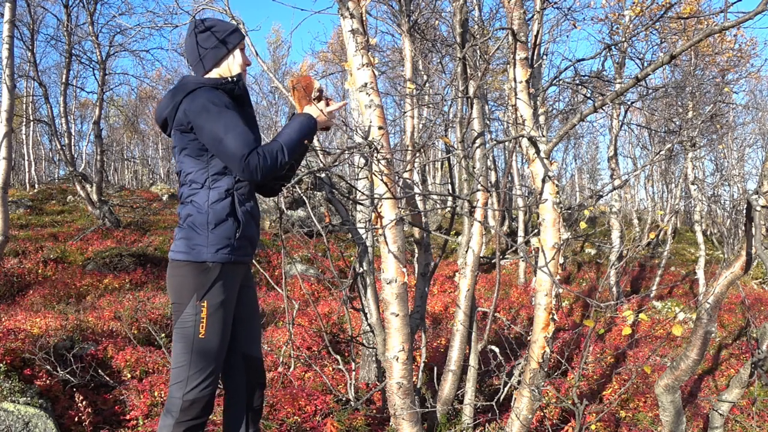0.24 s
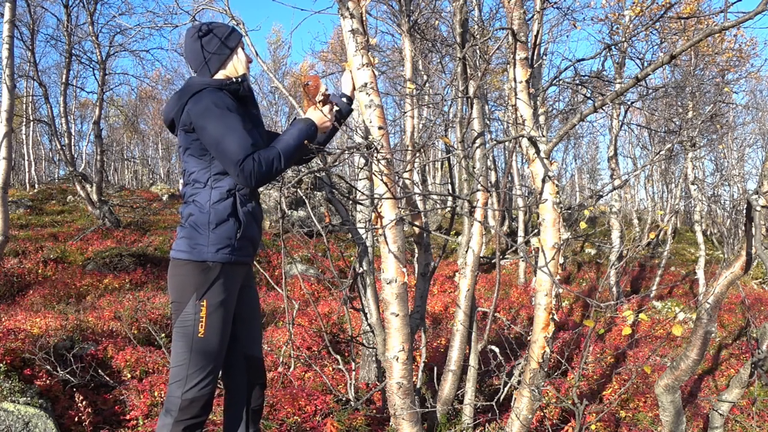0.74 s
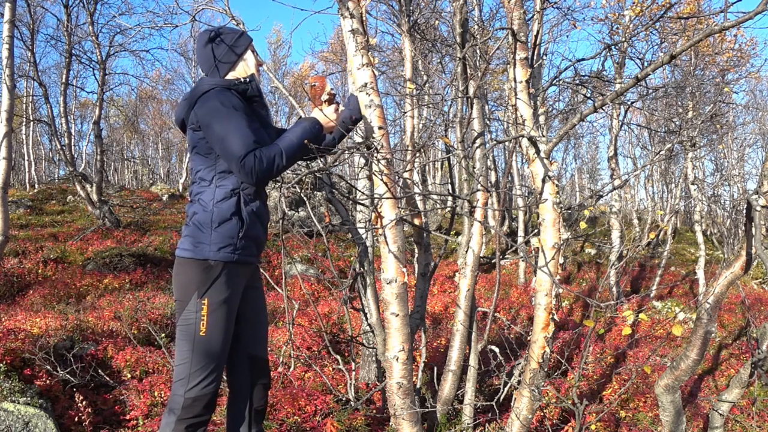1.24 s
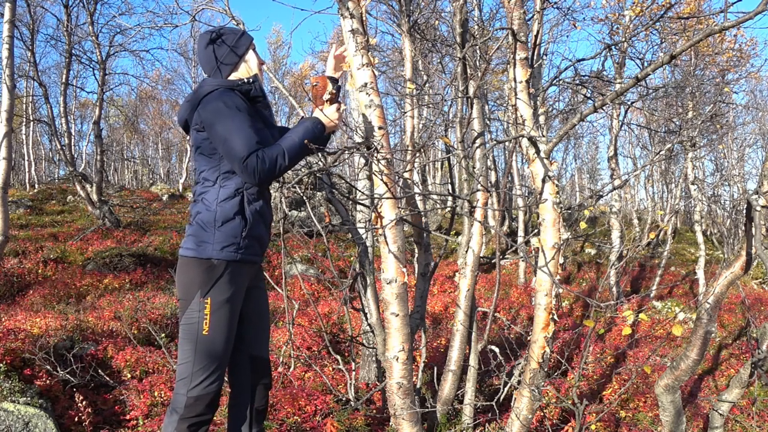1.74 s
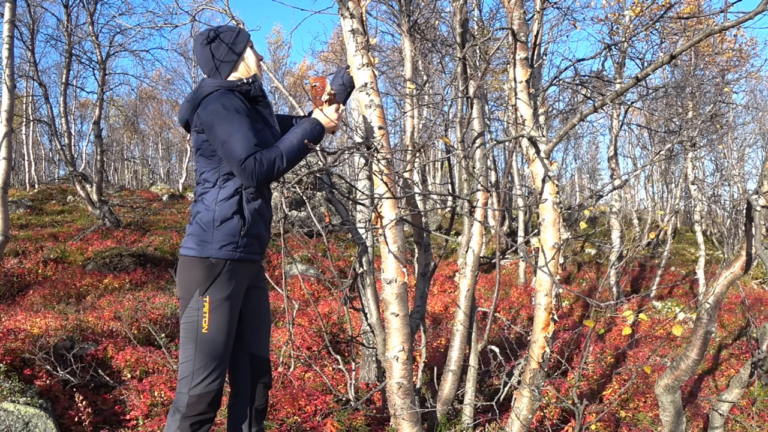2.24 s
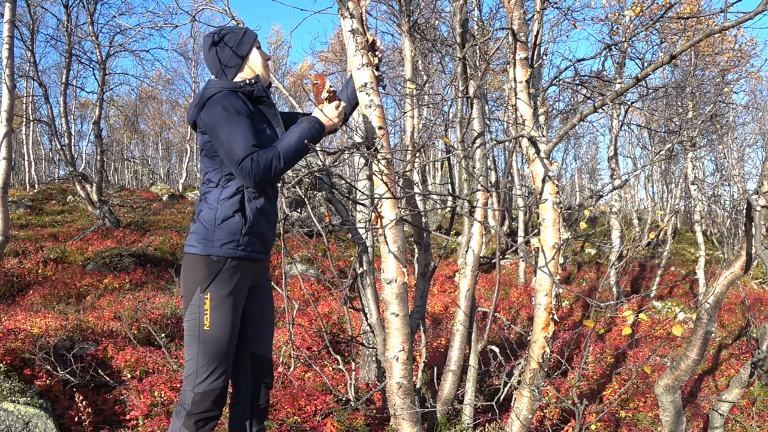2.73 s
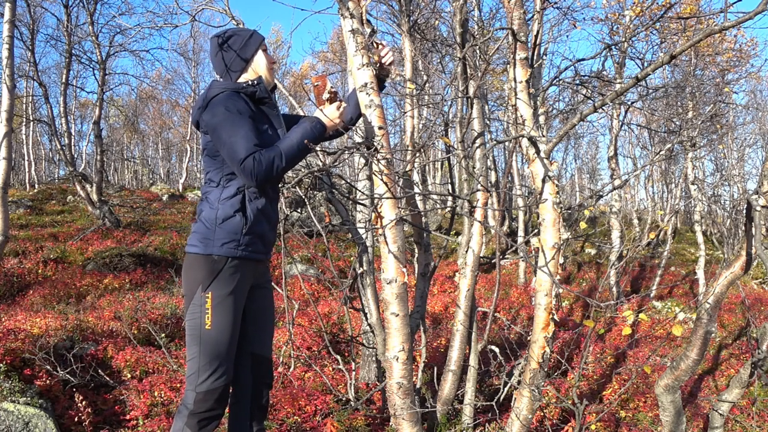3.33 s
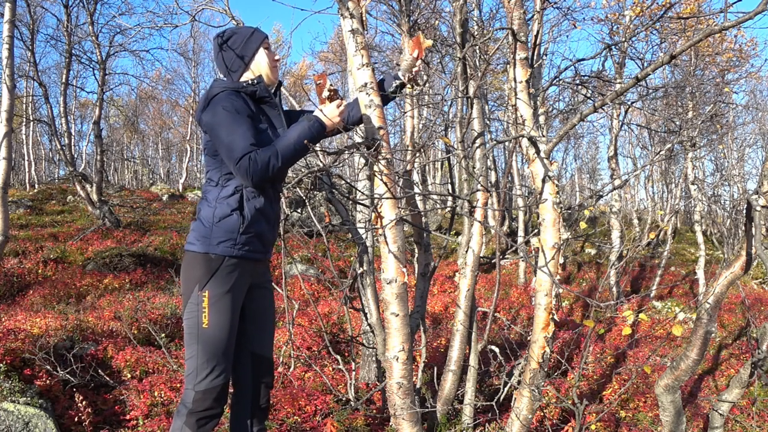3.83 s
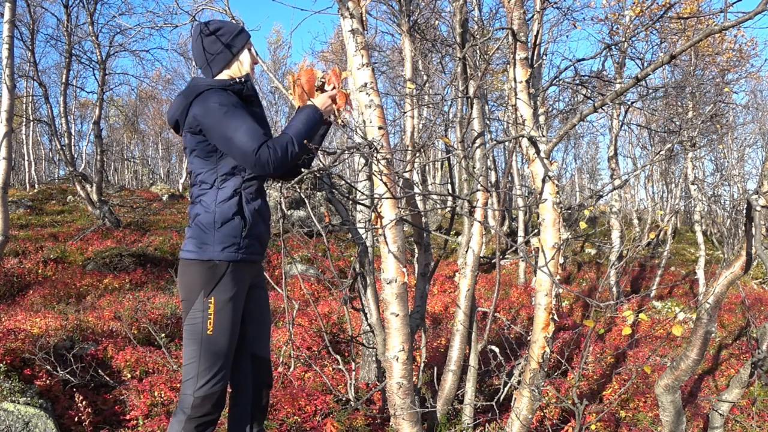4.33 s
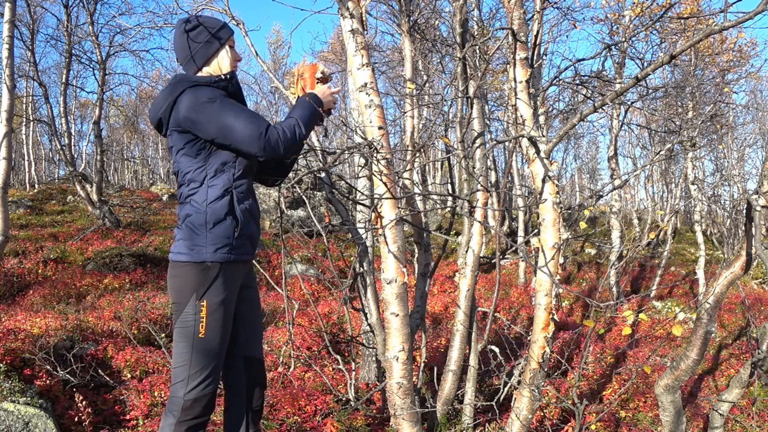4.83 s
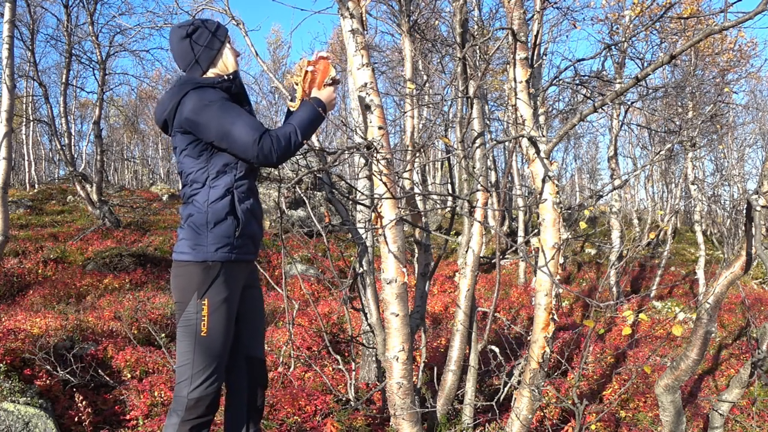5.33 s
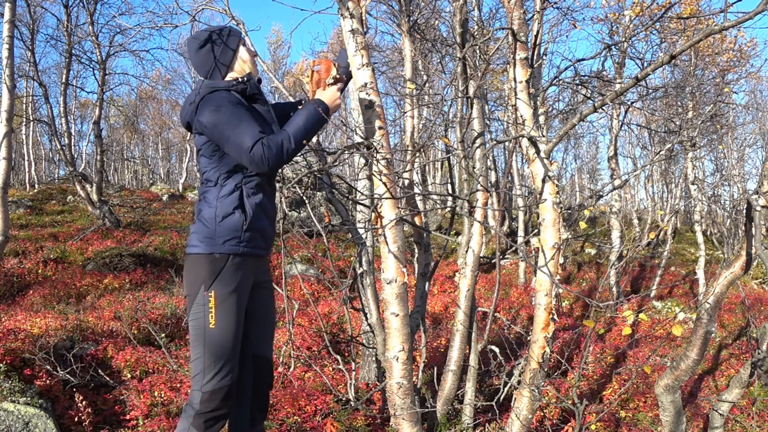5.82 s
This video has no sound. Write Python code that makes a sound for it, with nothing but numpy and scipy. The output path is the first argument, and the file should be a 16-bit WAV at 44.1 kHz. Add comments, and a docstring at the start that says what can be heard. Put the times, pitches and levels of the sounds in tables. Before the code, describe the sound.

Irregular crisp snaps, short rips and papery crinkling of dry bark pulled from a trunk, with soft outdoor rumble and faint hiss behind.

```python
"""A low rumble and faint hiss of air come first, then dry birch bark is peeled by hand in a quiet wood.
The papery layers crackle and rustle as the hand moves: grains of noise, coloured and swelled.
Snaps are millisecond bursts of noise with a shivering ring; tears are dense runs of tiny fractures.
Under a steady pull the bark creaks in dull resonant ticks. The trees add a thin, scattered echo."""
import sys
import numpy as np
from scipy import signal
from scipy.fft import rfft, irfft, next_fast_len
from scipy.io import wavfile
from scipy.ndimage import map_coordinates

SR = 44100
rng = np.random.default_rng(int(sys.argv[2]) if len(sys.argv) > 2 else 0)


def unload_audio(sound):
    """Save the sound as a 16-bit wav file, at the path given as the first command line argument."""
    columns = np.transpose(np.atleast_2d(sound))
    # keep every value between -1 and 1, then stretch to whole-number steps
    steps = np.round(np.clip(columns, -1, 1) * 32767)
    wavfile.write(sys.argv[1], SR, steps.astype(np.int16))


N = 267687  # length of the scene [samples]

# colour of the open air: (frequency [Hz], relative level [dB])
AIR_COLOUR = [(15, -2), (28, 0), (52, 1.5), (80, -1), (130, -14), (250, -11.5), (500, -11), (1100, -13.5),
              (2000, -21.5), (4000, -25), (6300, -23), (9000, -32.5), (13000, -43), (16000, -59)]
# how alike the air is in the two ears: (frequency [Hz], likeness [0 to 1])
AIR_LIKENESS = [(60, 1), (130, 0.69), (400, 0.033), (1500, 0.04), (6000, 0.073)]

# the hand bends the sheet and it crinkles: (start [s], length [s], middle level before a trim [dB])
CRINKLE_MOVES = [(0.03, 0.21, -54), (0.18, 0.19, -48.5), (0.77, 0.33, -54), (1.17, 0.62, -60.5),
                 (1.97, 0.26, -53), (2.2, 0.71, -57), (2.86, 0.13, -51.5), (3.1, 0.55, -51.5),
                 (3.76, 0.12, -52.5), (3.94, 0.075, -51), (4.2, 0.74, -56.5), (4.8, 0.17, -50.5),
                 (5.0, 0.22, -48.5), (5.4, 0.33, -62.5), (5.69, 0.24, -60.5)]
# sleeve and glove rub along: (start [s], length [s], middle level before a trim [dB])
RUB_MOVES = [(0.13, 0.27, -53.5), (2.26, 0.48, -57), (2.69, 0.12, -53), (3.47, 0.19, -53.5),
             (4.32, 0.25, -49), (4.62, 0.2, -54), (4.85, 0.45, -55), (5.68, 0.2, -56)]
# colour of the crinkling paper: (frequency [Hz], relative level [dB])
CRINKLE_COLOUR = [(880, -57), (1500, -12), (1740, -11), (2100, -8), (2800, -8.5), (3920, -4), (4970, -9),
                  (6430, 0), (9100, -11.5), (11000, -11), (13800, -24.5), (16000, -33)]
# colour of the rubbing: (frequency [Hz], relative level [dB])
RUB_COLOUR = [(200, -29), (500, -8), (1100, -2), (2500, -6), (4000, -2), (8000, -9), (16000, -43)]
HELD_CRINKLE_DB, HELD_RUB_DB = -70, -79  # the sheet merely held, before the same trims
HAND_SWELL_DB = 5  # the middle of a movement over its ends

# how long the echo lasts in the wood: (frequency [Hz], time to fall 60 dB [s])
ECHO_DECAY = [(200, 1), (1000, 0.47), (4000, 0.18), (12000, 0.22)]
# strength of the echo: (frequency [Hz], level [dB])
ECHO_LEVEL = [(200, -15), (1000, -8.5), (2500, -14), (6000, -16), (14000, -8)]

# loud fractures of the bark:
# (time [s], level [dB], body [dB], edge [dB], after-ring before a trim [dB])
FRACTURES = [(0.0542, -45, 1, -16, -5), (0.088, -40.5, -4, -6, -9), (0.221, -41, 4, -6, -3.5),
             (0.3723, -44.5, 3, 0, -3), (0.666, -52.5, -2, 17, -13), (0.9342, -42.5, 12.5, -1, -6.5),
             (0.982, -27.5, 2, 9, -12), (1.0038, -39, 4, 7, -4), (1.0284, -36.5, -3, 1, -18),
             (1.0439, -39.5, 6.5, -5, -4),          (1.2026, -49, -2, 7, -7), (1.253, -22, 3, -0.5, -6.5),
             (1.3221, -33.5, 6.5, -3, -2.5), (1.358, -36, 3, 4, -6), (1.5641, -45, -1, 10, -11),
             (2.1162, -40, 0, 1, -4.5), (2.3514, -38, -3, 14, -5), (2.361, -32, -8, -4, -0.5),
             (2.402, -23.5, -1.5, -6, -12), (2.4167, -29, -4, -11, -5), (2.4318, -26, -3.5, 0, -12),
             (2.5765, -29, -10.5, -12, -27), (2.5938, -39.5, 14, 1, -7), (2.6036, -32.5, -4, 1, -11),
             (2.6129, -34.5, 7.5, 6, -13), (3.0416, -38, 11, 1, -7.5), (3.0774, -44, 5, 8, -6.5),
             (3.2242, -35, -22, 2, -6), (3.233, -29, 3, -2, -7.5), (3.2528, -23.5, 1, 3, -14.5),
             (3.311, -33, 10.5, -7, -12), (3.3261, -29, -1, 8, -13), (3.3424, -37.5, 1, -8, -13),
             (3.3914, -30.5, -2, 0, -2), (3.3972, -21, -3, -9, -6), (3.405, -26, -2.5, -1, -10),
             (3.413, -34, 5, 1, -5), (3.442, -36.5, 5, -4, -16), (3.4688, -32, -4, 3, -3.5),
             (3.5301, -29, 11, 0, -6), (3.599, -40, 8, 4, -7), (3.722, -39, 6, -11, -19),
             (3.8157, -40, -21, -7, -25), (3.822, -38.5, -17, -4, -9), (3.935, -47, 6, -9, -7),
             (3.954, -40, -2, -9, -1.5), (4.004, -41.5, -2, -11, -1.5), (4.1985, -42.5, 1, -5, -4.5),
             (4.9297, -39, -14, 6, -8), (5.1528, -46, 11, -4, -8), (5.323, -42.5, -21, 13, -21),
             (5.6912, -43, 6, -5, -3), (5.833, -28, -7.5, -12, -16), (5.8632, -33, -4, -5.5, -17),
             (5.9337, -31, -2, -1, 0), (5.9491, -31.5, -7, -5, -19), (5.98, -35, -1, -17, -19),
             (6.025, -38, 6, -3, -6), (6.0551, -29, 0, 5, -7), (6.0622, -26, 7, 1, -8)]
# colour of breaking bark: (frequency [Hz], relative level [dB])
BARK_COLOUR = [(59, -60), (100, -19.5), (289, -18), (1100, -9), (2000, -10.5), (2800, -7), (3620, -4.5),
               (4290, 0), (5080, -5.5), (6290, 3), (8830, -10.5), (10200, -10.5), (11600, -14),
               (13500, -23.5), (16000, -38)]

# a layer zips off the one below: (start [s], length [s], level before a trim [dB], body [dB])
TEAR_STROKES = [(0.271, 0.064, -50.5, 5), (0.991, 0.053, -47, 0.5), (1.279, 0.074, -48, 2),
                (2.37, 0.035, -41, 0), (2.407, 0.044, -34, 3), (2.567, 0.033, -51, 10),
                (3.4, 0.04, -42, 6.5), (3.463, 0.037, -41, 3), (3.519, 0.093, -42, 2),
                (4.634, 0.014, -47, -2.5), (4.795, 0.018, -42, -1.5), (4.816, 0.018, -37, -14.5),
                (4.885, 0.013, -42, -6), (5.953, 0.068, -45.5, 3.5)]
TEAR_ATTACK_S, TEAR_RELEASE_S = 0.0037, 0.025

# hard slips that stand out of the creak: (time [s], level [dB])
HARD_SLIPS = [(0.767, -46), (0.786, -43.5), (0.828, -41.5), (0.847, -46.5), (0.901, -42), (1.005, -47),
              (1.113, -43.5), (1.18, -43), (1.229, -38.5), (1.297, -42), (1.372, -44), (1.428, -47.5),
              (1.477, -46.5), (1.527, -45.5), (1.603, -42), (1.638, -45), (1.685, -46.5), (2.239, -47.5),
              (2.282, -45), (2.294, -46)]
# steady pulls that make the sheet creak: (start [s], length [s], usual level of small slips [dB])
STEADY_PULLS = [(0.723, 0.17, -49), (1.072, 0.095, -48), (1.42, 0.38, -56), (2.205, 0.11, -52)]
# dull resonances of the creak: (frequency [Hz], width [Hz], level [dB])
CREAK_MODES = [(673, 170, 4), (1145, 150, 3), (2260, 130, -11)]
SLIP_PITCH_SPREAD = 0.085  # octaves
SLIP_GAP_S, SLIP_UNEVEN = 0.022, 0.3  # typical gap, and the spread of its natural logarithm
SLIP_SPREAD_DB = 2

# ripple of the microphone port: (frequency [Hz], gain [dB])
PORT_RIPPLE = [(5300, 0.5), (6050, 0.1), (6600, -1.5), (7600, .5), (8800, -0.35), (10200, 0.36),
               (12000, -3.5), (13400, 2.5), (15500, 0)]
TOP_HZ = 16000  # upper band limit


def amp(db):
    """Turn decibels into gain."""
    return 10 ** (np.asarray(db) / 20)


def unit(x):
    """Scale a sound to an rms of 1."""
    return x / np.sqrt(np.mean(x ** 2) + 1e-20)


def along(points, hz):
    """Read (Hz, value) points between their knots on a log frequency axis."""
    f, v = np.transpose(points)
    return np.interp(np.log(hz + 1), np.log(f + 1), v)


def wobble(rate):
    """Draw a smooth random curve with this many knots a second."""
    knots = rng.standard_normal(int(N * rate / SR) + 4)
    return map_coordinates(knots, [np.arange(N) * rate / SR])


def filtered(x, response):
    """Shape a sound by a response that depends on frequency."""
    m = next_fast_len(N + SR // 2)
    hz = np.fft.rfftfreq(m, 1 / SR)
    return irfft(rfft(x, m) * response(hz), m)[..., :N]


def causal(gain):
    """Give a gain curve minimum phase, so the sound starts promptly with nothing ahead of it."""
    cep = irfft(np.log(np.maximum(gain, 1e-6)))
    half = len(cep) // 2
    folded = np.r_[cep[0], 2 * cep[1:half]]
    return np.exp(rfft(folded, len(cep)))


def resonances(modes, hz):
    """Add up resonances, each passing a band around its own frequency."""
    return sum(amp(db) * 1j * hz * width / (centre * centre - hz * hz + 1j * hz * width)
               for centre, width, db in modes)


def add(track, s, sound):
    """Mix a sound into the track at time s."""
    part = track[max(round(s * SR), 0):][:len(sound)]
    part += sound[:len(part)]


def air(level_db=-56):
    """Steady low rumble and faint hiss of open air, wide except in the deep bass."""
    def colour(hz):
        # more of the side signal makes the two ears less alike
        turn = np.arccos(np.clip(along(AIR_LIKENESS, hz), -1, 1)) / 2
        return amp(along(AIR_COLOUR, hz)) * [np.cos(turn), np.sin(turn)]

    mid, side = filtered(rng.standard_normal((2, N)), colour)
    drift_db = 0.2 * wobble(2.37)
    return amp(level_db + drift_db) * unit(np.array([mid + side, mid - side]))


def movements(rows, rest_db):
    """Gain of hand movements over a resting level: each speeds up to its middle and slows again."""
    t = np.arange(N) / SR
    power = amp(rest_db) ** 2
    for s, length, db in rows:
        off_middle = 2 * (t - s) / length - 1  # -1 at the start, 1 at the end
        power = power + amp(db - HAND_SWELL_DB * off_middle ** 2) ** 2
    return np.sqrt(power)


def crackles(rate, spread_db):
    """Tiny fractures at random moments, rate a second on average, each a short puff of noise."""
    chance, size = rng.random(N), rng.standard_normal(N)
    sign = rng.choice([-1, 1], N)
    pulses = (chance < rate / SR) * amp(spread_db * np.minimum(size, 2)) * sign
    t = np.arange(SR // 50) / SR
    fade = np.exp(-t / 0.0003) + 0.09 * np.exp(-t / 0.0032)  # a quick drop and a weak, longer tail
    energy = np.convolve(pulses ** 2, fade)[:N]
    return unit(np.sqrt(energy) * rng.standard_normal(N))


def handling(crinkle_db=-1, tick_db=-5, rub_db=-4):
    """Papery layers slide and crinkle; sleeve and glove rub along with them."""
    crinkle_gain = movements(CRINKLE_MOVES, HELD_CRINKLE_DB)
    rub_gain = movements(RUB_MOVES, HELD_RUB_DB)
    grip = amp(3.36 * wobble(60))  # the sliding catches and lets go
    fine = crackles(rate=2200, spread_db=8.5)
    ticks = crackles(rate=70, spread_db=6.0)
    grains = (fine + amp(tick_db) * ticks) * grip
    paper = unit(filtered(grains, lambda hz: causal(amp(along(CRINKLE_COLOUR, hz)))))
    friction = crackles(rate=1800, spread_db=7.5) * grip
    rub = unit(filtered(friction, lambda hz: amp(along(RUB_COLOUR, hz))))
    return amp(crinkle_db) * crinkle_gain * paper + amp(rub_db) * rub_gain * rub


def trees(x):
    """Trunks and ground scatter a thin echo, different in each ear."""
    hz, t, noise = signal.stft(rng.standard_normal((2, SR * 3 // 4)), SR, nperseg=256)
    late = amp(-60 * t / along(ECHO_DECAY, hz)[:, None])
    early = 3.9 * amp(-60 * t / 0.012)  # strong at first, down 60 dB in 12 ms
    tail = signal.istft(noise * (late + early), SR, nperseg=256)[1]
    tail = tail / np.linalg.norm(tail[0])
    delayed = np.pad(x, (SR // 300, 0))[None]  # the echo starts about 3 ms late
    wet = signal.fftconvolve(delayed, tail, axes=1)[:, :N]
    return filtered(wet, lambda hz: amp(along(ECHO_LEVEL, hz)))


def snaps(burst_s=0.0012, lead_s=0.0011, lead_db=-10, ring_t60=0.064, ring_db=-3,
          body_hz=1800, edge_hz=9000, flake_db=1.55, size=8192):
    """First fibres give, the rest break in a millisecond burst, then the stiff sheet shivers."""
    track, hz = np.zeros(N), np.fft.rfftfreq(size, 1 / SR)
    t = (np.arange(size) - SR // 200) / SR  # 5 ms of room for the first fibres
    age = np.abs(t)
    head, after = (t >= 0) & (t < .0034), (t >= .0034) & (t < .01)  # where the levels are set
    fading = (t > 0) * amp(-60 * age / ring_t60) * (1 - np.exp(-age / burst_s))
    for s, db, body_db, edge_db, after_db in FRACTURES:
        fibres, shiver, clumps = rng.standard_normal((3, size))
        # a clean break is over sooner and leaves the sheet quieter
        length = burst_s * amp(.5 * np.clip(after_db + 12.5, -20, 3))
        breaking = np.where(t < 0, amp(lead_db) * np.exp(-age / lead_s), np.exp(-age / length))
        # broad flakes have more body, thin splinters more edge
        body = body_db / (1 + (hz / body_hz) ** 4)
        edge = edge_db * (1 - 1 / (1 + (hz / edge_hz) ** 8))
        # and every flake has a few broad resonances of its own
        flake = np.interp(hz, np.linspace(0, SR / 2, 24), flake_db * rng.standard_normal(24))
        colour = causal(amp(along(BARK_COLOUR, hz) + body + edge + flake))
        burst = irfft(rfft(np.sign(fibres) * breaking) * colour)
        ring = irfft(rfft(shiver * amp(6.8 * clumps) * fading) * colour)
        crack = burst / burst[head].std() + amp(after_db + ring_db) * ring / ring[after].std()
        add(track, s + t[0], amp(db) * crack)
    return track


def stroke(start, length):
    """Envelope of one tear: it rises around its start, holds, and dies away."""
    t = np.arange(N) / SR - start
    rise = np.clip(.5 + t / TEAR_ATTACK_S, 0, 1)
    return rise * np.exp(-2 * np.maximum(t - length, 0) / TEAR_RELEASE_S)


def tears(level_db=-1, body_hz=3000, splinter_db=-4):
    """A tear is a dense run of parting fibres with larger splinters breaking among them."""
    fibres = crackles(rate=2200, spread_db=9)
    splinters = crackles(rate=140, spread_db=-0.5)
    breaking = fibres + amp(splinter_db) * splinters
    rip = unit(filtered(breaking, lambda hz: causal(amp(along(BARK_COLOUR, hz)))))
    body = filtered(rip, lambda hz: 1 / (1 + (hz / body_hz) ** 4))
    track = np.zeros(N)
    for s, length, db, body_db in TEAR_STROKES:
        tear = rip + (amp(body_db) - 1) * body  # raise or lower the part below body_hz
        track += amp(db + level_db) * stroke(s, length) * tear
    return track


def small_slips(count=48):
    """Under each pull the bark sticks and slips at an uneven rate: (time [s], level [dB])."""
    slips = []
    for start, length, db in STEADY_PULLS:
        gap, strength = rng.standard_normal((count, 2)).T
        ages = np.cumsum(SLIP_GAP_S * np.exp(SLIP_UNEVEN * gap)) - SLIP_GAP_S
        for age, z in zip(ages, strength):
            if age < length:
                slips.append((start + age, db + SLIP_SPREAD_DB * z))
    return slips


def creak(soft_hz=2750, size=2048, count=256):
    """The strained bark slips in single dull ticks, each a little different in pitch."""
    track, hz = np.zeros(N), np.fft.rfftfreq(size, 1 / SR)
    head = round(.003 * SR)  # the first 3 ms set the level
    slips = HARD_SLIPS + small_slips()
    for (s, db), chance in zip(slips, rng.standard_normal(count)):
        pitch = 2 ** (SLIP_PITCH_SPREAD * chance)
        # a soft contact dulls the treble
        soft_contact = causal(1 / np.sqrt(1 + (hz / (soft_hz * pitch)) ** 6))
        tick = irfft(resonances(CREAK_MODES, hz / pitch) * soft_contact)
        add(track, s, amp(db) * tick / tick[:head].std())
    return track


def scene(left_db=0.3):
    """The bark sounds almost straight ahead, with its echo and the open air around it."""
    bark = snaps() + tears() + creak() + handling()
    direct = bark * amp([[left_db], [-left_db]])
    return direct + trees(bark) + air()


def record(dry):
    """The microphone port ripples the treble, and a steep band limit cuts what lies above it."""
    heard = filtered(dry, lambda hz: amp(along(PORT_RIPPLE, hz)))
    return filtered(heard, lambda hz: 1 / (1 + (hz / TOP_HZ) ** 120))


dry = scene()
out = record(dry)
unload_audio(out)
```